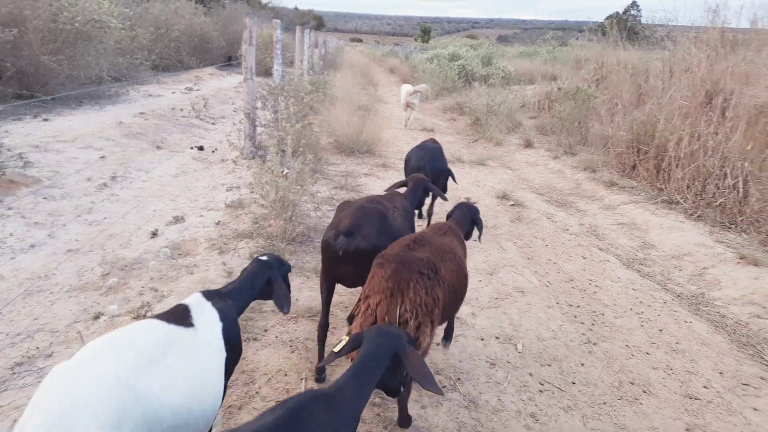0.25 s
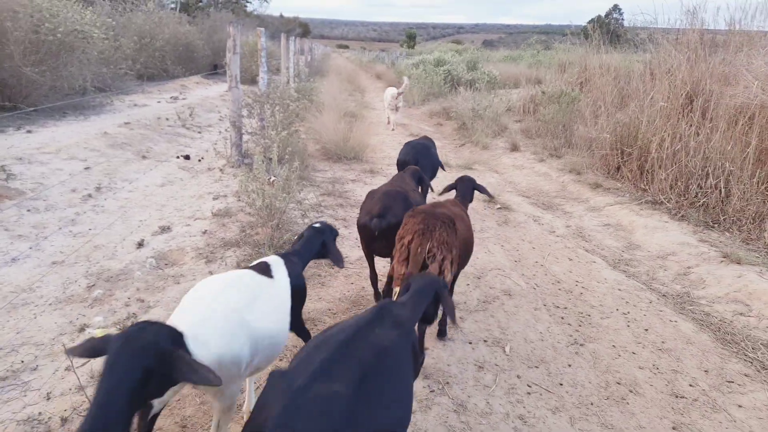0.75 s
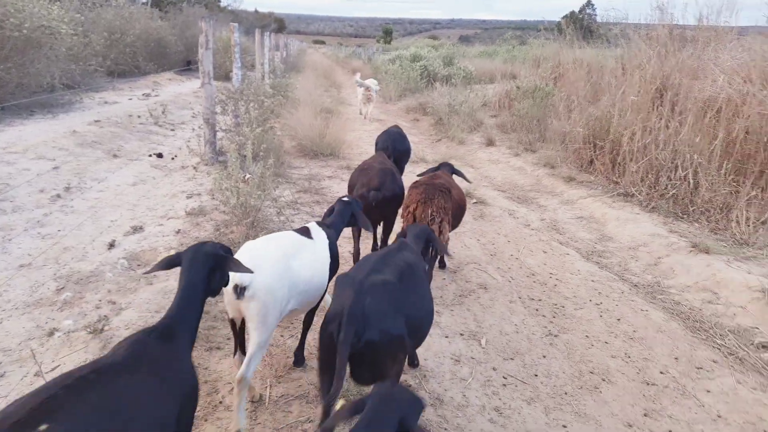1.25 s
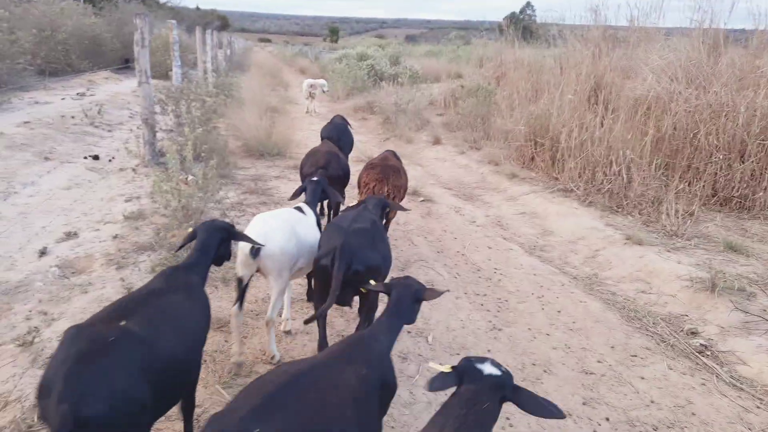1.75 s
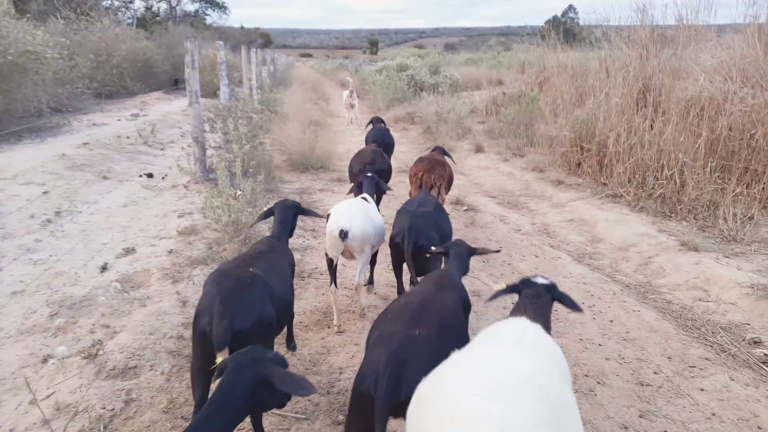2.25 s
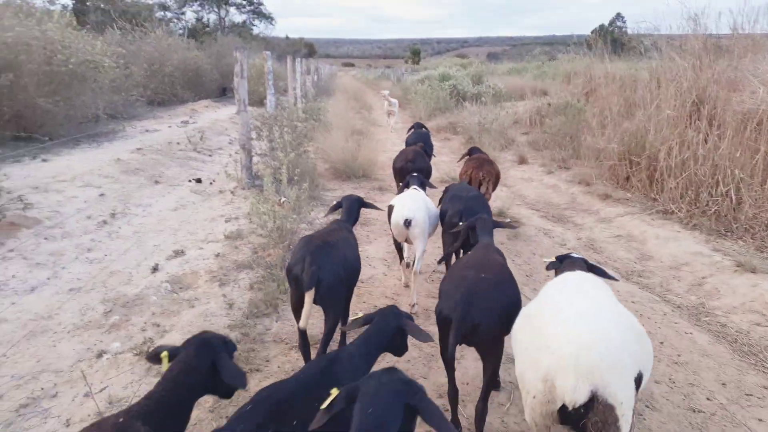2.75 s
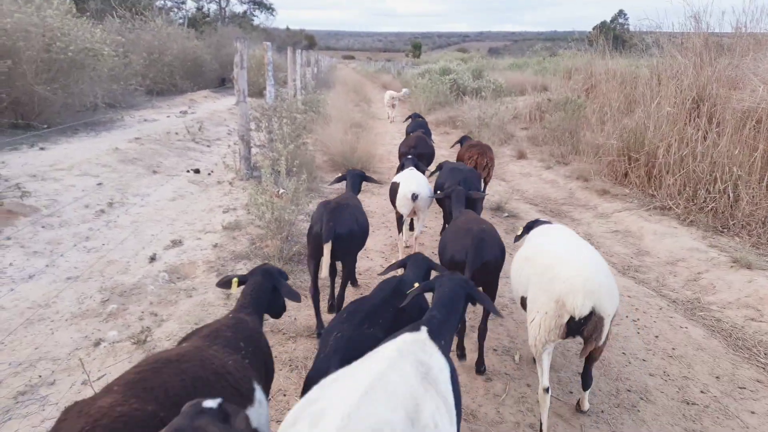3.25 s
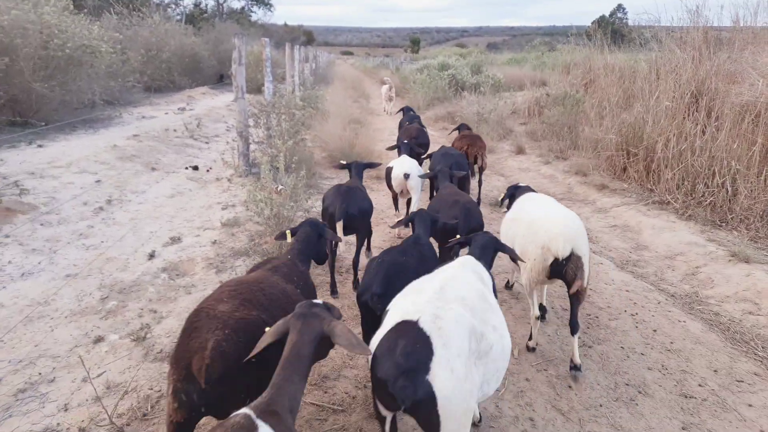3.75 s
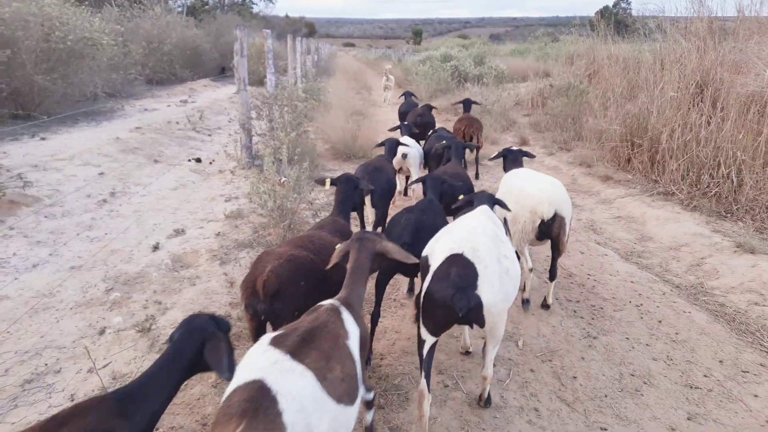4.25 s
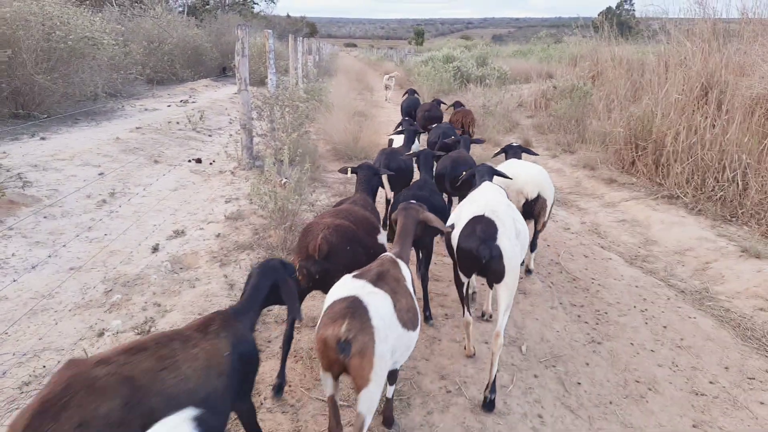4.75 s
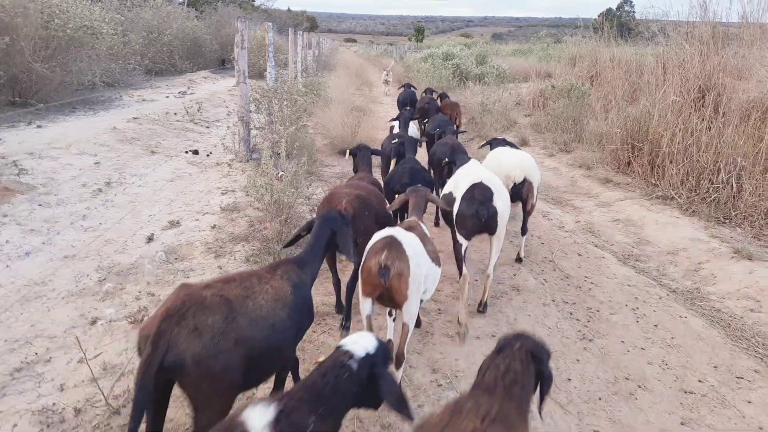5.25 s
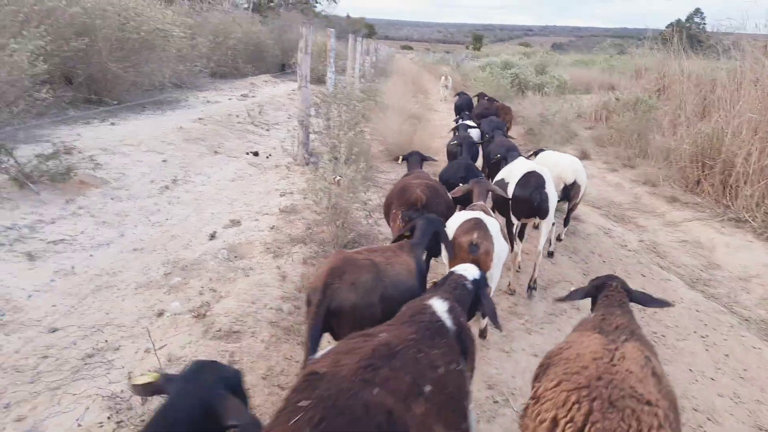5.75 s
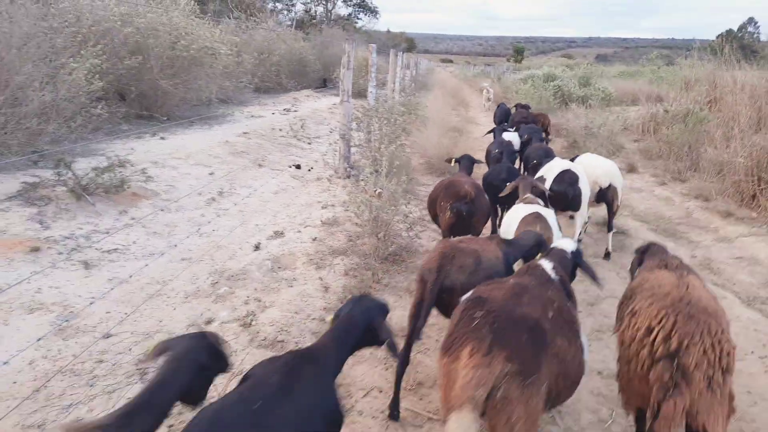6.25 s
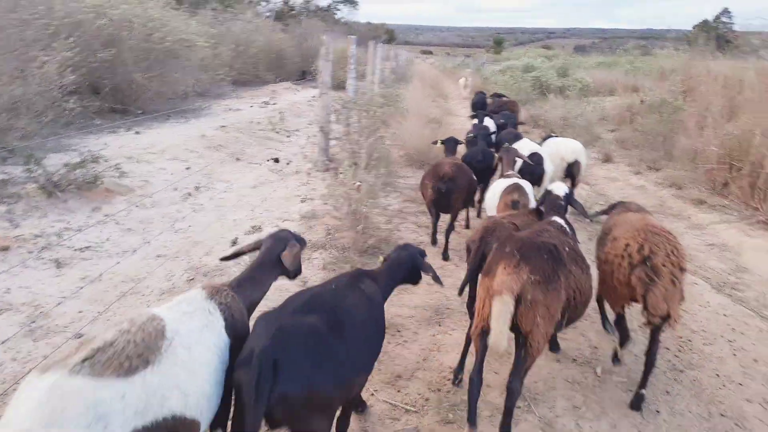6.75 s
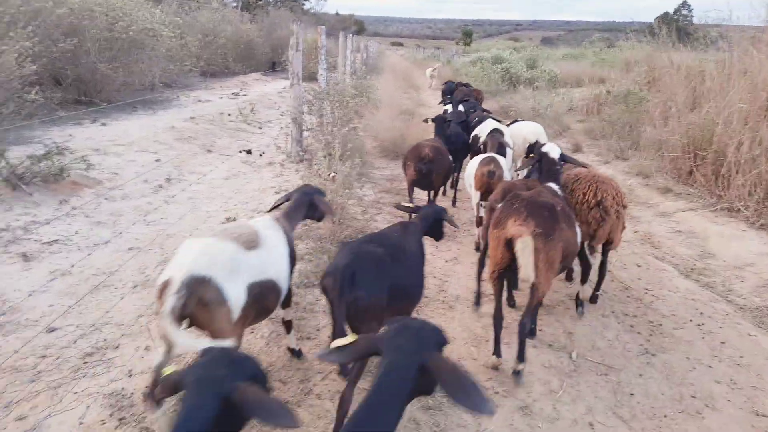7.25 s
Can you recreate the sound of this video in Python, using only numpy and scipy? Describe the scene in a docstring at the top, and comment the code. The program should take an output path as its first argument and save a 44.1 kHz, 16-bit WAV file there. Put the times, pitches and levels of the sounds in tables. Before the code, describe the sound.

Sheep hooves patter on a dry dirt track in open country. Quiet, scattered crunches and soft thuds come first, then sharper gritty steps stand out around the middle, and the last seconds are busiest and loudest. Dragged feet scrape, small pebbles click, dust hisses. Low wind gusts rumble now and then on a close handheld stereo phone microphone, over a faint steady hush.

```python
"""On a dry dirt track a flock of sheep trots past a phone with two microphone ports.
Each hoof thuds the soil, knocks and crunches grit: bursts of noise grains ring resonances.
Steadier grain noise makes dragged feet and far hooves; short decaying tones make skipping pebbles.
Gusts rumble on the ports, over a steady hush, with a few hollow notes and one thin high tick."""
import sys
import numpy as np
from scipy import signal
from scipy.io import wavfile
from scipy.ndimage import uniform_filter1d

SR = 44100
rng = np.random.default_rng(int(sys.argv[2]) if len(sys.argv) > 2 else 0)


def wav_record(signal):
    """Record a signal, one row per channel, as 16-bit PCM in the file named by sys.argv[1]."""
    frames = np.transpose(np.atleast_2d(signal))
    bounded = np.clip(frames, -1, 1)
    # unit amplitude maps onto the largest positive 16-bit level
    quanta = np.round(bounded * 32767).astype(np.int16)
    wavfile.write(sys.argv[1], SR, quanta)


N = 330309

# clear footfalls, levels before each layer's trim: time [s], crunch_level [dB], thud_level [dB],
# knock_level [dB], grit_level [dB], pebble_pitch [Hz], crunch_fade over 60 dB [s]
STEPS = [(0.063, -47, -40, -59, -51, 3180, 0.076), (0.0904, -48.5, -52, -63, -55, 4760, 0.14),
         (0.3647, -51, -45, -68, -54, 3320, 0.071), (0.4399, -37.5, -71, -64, -36, 3630, 0.027),
         (.52, -46, -63, -61, -44.5, 4260, 0.052), (0.6809, -34, -43.5, -41, -62, 2520, 0.047),
         (0.701, -38.5, -44, -49, -46, 3000, 0.062), (.868, -46, -62, -58, -55, 4200, .015),
         (.8975, -36.5, -48, -44.5, -57, 3800, 0.021), (1.2284, -53, -54.5, -46, -48, 2760, 0.095),
         (1.2495, -35, -47, -47.5, -39, 4000, 0.074), (1.3814, -48, -40.5, -54, -50, 3800, 0.056),
         (1.4892, -43, -67, -55, -49, 3200, .081), (1.512, -39, -53.5, -52.5, -54, 3820, 0.071),
         (1.528, -55, -43, -53, -59, 3050, 0.055), (1.6053, -28.5, -36.5, -31.5, -50, 3430, 0.053),
         (1.6196, -22, -35.5, -32.5, -28.5, 3800, 0.031), (1.7148, -59, -40.5, -45, -65, 2370, 0.067),
         (1.7608, -41, -44, -47, -49, 2870, 0.071), (1.8374, -55, -39, -48, -58, 2770, 0.076),
         (1.8483, -50, -41.5, -44.5, -52, 2620, 0.076), (1.8819, -34.5, -47, -62, -40, 4050, 0.021),
         (2.0747, -55, -45, -39.5, -50, 3100, 0.051), (2.091, -44, -45.5, -47.5, -42, 3500, 0.04),
         (2.2249, -52, -47.5, -40.5, -51, 3600, 0.044), (2.2638, -38.5, -57, -53, -43, 3970, .039),
         (2.3222, -43, -68, -55, -54, 4000, 0.062), (2.4275, -50, -42, -54, -50, 3500, 0.037),
         (2.4924, -57, -32, -32, -58, 3700, 0.015), (2.6384, -21.5, -42, -35.5, -38, 3600, 0.062),
         (2.801, -45, -42.5, -58, -46, 2830, 0.048), (2.8742, -63, -40, -41.5, -48, 3670, 0.031),
         (2.9175, -57, -40.5, -71, -64, 2150, 0.045), (2.9784, -49, -46, -64, -48, 2940, 0.028),
         (3.091, -52, -49, -62, -41.5, 2790, 0.028), (3.1649, -63, -53, -69, -60, 4080, 0.031),
         (3.1877, -52, -44, -68, -42.5, 4150, 0.021), (3.2154, -36, -56, -50, -58, 3070, .024),
         (3.235, -39.5, -48.5, -53, -57, 3070, 0.047), (3.3865, -38, -64, -52, -53, 3380, 0.019),
         (3.477, -37.5, -73, -59, -53, 3370, 0.016), (3.5186, -33.5, -42, -47.5, -37, 3100, 0.036),
         (3.535, -67, -35, -47, -44, 3260, 0.041), (3.5642, -28.5, -51, -60, -35, 5230, 0.02),
         (3.6194, -41, -46.5, -51, -49, 3570, 0.039), (3.655, -38, -52, -47.5, -36.5, 3070, .038),
         (3.7195, -43, -51, -57, -62, 2290, .052), (3.813, -38.5, -40.5, -48, -41, 2320, .044),
         (4.0357, -41, -50, -46, -39, 3320, 0.022), (4.044, -18, -49, -32, -31, 3380, 0.037),
         (4.0512, -18, -61, -45, -41, 3440, .034), (4.077, -28, -47, -44, -43, 3450, 0.093),
         (4.0886, -14, -41.5, -32, -26, 3600, 0.06), (4.203, -44.5, -49.5, -53, -41, 3580, 0.04),
         (4.2497, -33.5, -55, -40.5, -53, 2290, 0.011), (4.4544, -29.5, -63, -54.5, -37.5, 4280, 0.042),
         (4.487, -62, -48.5, -72, -61, 3310, 0.028), (4.6337, -47.5, -52, -66, -61, 2930, 0.067),
         (5.0123, -40, -44, -43, -51, 3800, .057), (5.0198, -28.5, -45, -55, -35, 3780, 0.11),
         (5.0897, -45, -46.5, -64, -56, 3550, 0.036), (5.176, -30, -51, -46, -40, 3300, 0.027),
         (5.1859, -17.5, -52, -39.5, -31, 3730, 0.037), (5.229, -33, -54, -47.5, -42.5, 3420, 0.078),
         (5.3079, -66, -45, -51.5, -47, 3300, 0.053), (5.374, -25, -53, -47.5, -34, 2940, .016),
         (5.45, -37, -69, -71, -44, 3530, 0.024), (5.471, -33.5, -57, -49, -50, 3350, 0.024),
         (5.503, -59, -56, -46, -65.5, 3460, 0.033), (5.539, -32, -57, -47, -61, 3080, 0.14),
         (5.6347, -12, -53, -42, -17.5, 3630, 0.038), (5.8983, -41.5, -59, -56, -41, 5030, 0.035),
         (6.053, -20, -38.5, -34, -56, 2970, .088), (6.1234, -47, -43, -49, -50, 2960, 0.042),
         (6.1786, -47, -50, -47, -43, 3330, 0.035), (6.2592, -18.5, -39.5, -35.5, -37, 2900, 0.068),
         (6.3253, -50, -50, -48, -41, 3520, 0.082), (6.4089, -30, -35.5, -38, -42, 3360, 0.0406),
         (6.4242, -19, -52, -41, -26.5, 3450, .04), (6.4336, -21, -30, -31.5, -36, 3760, 0.032),
         (6.4612, -22, -44, -41, -35, 3480, .046), (6.4863, -34.5, -58, -49, -42, 3230, 0.059),
         (6.584, -38, -76, -67, -60, 3560, 0.04), (6.6484, -43.5, -44, -43.5, -59, 3270, 0.063),
         (6.7226, -42.5, -50.5, -51, -54, 2980, 0.061), (6.8371, -27, -48, -48, -38, 3220, 0.11),
         (6.885, -41, -62, -65, -42.5, 3220, 0.048), (6.93, -29, -54, -45.5, -43, 3320, .04),
         (7.0184, -33.5, -61, -48.5, -57, 2760, 0.028), (7.1672, -43.5, -73, -64, -44, 3580, 0.045),
         (7.2538, -50.5, -44.5, -49, -44, 3180, 0.046), (7.3456, -56, -53.5, -51.5, -52, 3120, 0.064),
         (7.4585, -46, -59, -54, -46, 3200, 0.032)]
# what hoof, soil and grit ring with: pitch [Hz], width [Hz], relative_level [dB]
THUD = [(315, 77.5, 2.5), (570, 296, -5)]
KNOCK = [(746, 450, 0.0058), (1500, 1470, 0.045)]
CRUNCH = [(2486, 2120, -2), (4100, 2000, -1), (5150, 740, 1)]
GRIT = [(6270, 800, 1), (7720, 3400, -7.5), (8750, 480, -3.5), (10760, 2300, -20), (12000, 1100, -4),
        (14800, 2400, -8.5)]
LAG_LOW, LAG_HIGH = 9, 13  # samples by which the right port hears the lower and higher layers later


def undb(db):
    """Gain of a level in dB."""
    return 10 ** (np.asarray(db) / 20)


def unit(x):
    """Scale to an average strength (rms) of 1."""
    return x / np.sqrt(np.mean(x ** 2))


def ring(x, modes):
    """Sum of resonances; white noise of rms 1 comes out near rms 1."""
    out, power = 0, 0
    for k, (hz, width, db) in enumerate(modes):
        gain = undb(db)
        b, a = signal.iirpeak(hz, hz / width, fs=SR)
        out = out + (-1) ** k * gain * signal.lfilter(b, a, x)  # neighbours have opposite signs
        power += gain ** 2 * np.pi * width / SR
    return out / np.sqrt(power)


def narrow(x, hz, q):
    """One resonance applied twice, for steep sides."""
    mode = [(hz, hz / q, 0)]
    return ring(ring(x, mode), mode) * np.sqrt(np.pi * hz / q / SR * 2)


def grains(scatter_db, grain_s, size=N):
    """Noise made of short grains of uneven size; the biggest are capped."""
    k = max(int(grain_s * SR), 1)
    sizes = np.minimum(rng.exponential(size=size // k + 1), 3.5)
    force = np.repeat(undb(scatter_db * sizes), k)[:size]
    return unit(force) * rng.standard_normal(size)


def walk(rate):
    """Random levels, each held for 1 / rate seconds, then smoothed twice."""
    k = int(SR / rate)
    held = np.repeat(rng.standard_normal(N // k + 1), k)
    return uniform_filter1d(uniform_filter1d(held, k), k)[:N]


def ports(force, modes, lag, scatter_db, grain_s, apart, pan_db=0.):
    """Grains under the force ring the modes at both ports; the share 'apart' of power is each port's own."""
    apart, size = np.clip(apart, 0, 1), np.shape(force)[-1]
    both = grains(scatter_db, grain_s, size)
    noise = [np.sqrt(1 - apart) * both + np.sqrt(apart) * grains(scatter_db, grain_s, size)
             for _ in range(2)]
    push = force * np.array(noise)
    push *= np.sqrt(np.mean(force ** 2) / np.mean(push ** 2))  # the grains share out the force's energy
    left, right = ring(push, modes)
    return np.array([left * undb(pan_db / 2), np.roll(right, lag) * undb(-pan_db / 2)])


def curve(table):
    """Draw the columns of a table out over time, in straight lines between its rows."""
    s, *columns = np.transpose(table)
    return [np.interp(np.arange(N) / SR, s, c) for c in columns]


def air():
    """The steady hush of open country: even noise through broad resonances."""
    # broad colour of the hush: pitch [Hz], width [Hz], relative_level [dB]
    hush_modes = [(328, 530, -4.5), (1200, 2200, -7), (3420, 5000, -5), (7240, 4100, -5),
                  (12940, 3100, -4.5)]
    return ports(np.full(N, undb(-57.5)), hush_modes, LAG_HIGH, .3, 0.0032, 1.0)


def wind(db):
    """Eddies buffet each port mostly on its own, the left one harder in strong gusts."""
    # low rumble at the ports: pitch [Hz], width [Hz], relative_level [dB]
    rumble_modes = [(54, 31.5, 0.5), (100, 55.9, 0.5), (159.2, 66.3, -5)]
    lean_db = 0.14 * (db + 61)
    buffet_db = np.array([lean_db + 3 * walk(12), -lean_db + 3 * walk(21)])
    return ports(undb(db + 9.5 + buffet_db), rumble_modes, 0, 4.3, .015, 0.89)


def tick():
    """A few milliseconds of one very high pitch, swelling and fading in a bell shape."""
    # the tick, level before a small trim: start [s], peak_level [dB], pitch [Hz], spread [s],
    # left_minus_right [dB]
    tick_rows = [(6.755, -21, 13150, 0.0011, 7)]
    s, db, hz, spread, pan = tick_rows[0]
    t = np.arange(N) / SR
    bell = np.exp(-.5 * ((t - s - 2 * spread) / spread) ** 2)  # peaks two spreads after the start
    tone = bell * np.sin(2 * np.pi * hz * t)
    return np.outer(undb(db - 0.5 + np.array([pan, -pan]) / 2), tone)


def notes():
    """Short hollow notes: rough tones that glide, with wavering pitch and level, and fade."""
    # middle of the waver: start [s], from_pitch [Hz], to_pitch [Hz], length [s], level [dB]
    note_rows = [(0.799, 870, 883, 0.11, -51.5), (1.217, 860, 895, 0.06, -44),
                 (3.82, 1160, 1140, 0.052, -52), (4.728, 1190, 1260, 0.068, -52),
                 (5.011, 690, 680, 0.0098, -32.5)]
    out = np.zeros(N)
    waver = 1 + 0.09 * walk(300)
    for s, from_hz, to_hz, length, db in note_rows:
        u = np.linspace(0, 1, int(length * SR))
        i = int(s * SR)
        hz = (from_hz + (to_hz - from_hz) * u) * waver[i:i + len(u)]
        swell = np.sin(np.pi * u ** 0.62) ** 2
        out[i:i + len(u)] = undb(db) * swell * np.sin(2 * np.pi * np.cumsum(hz) / SR)
    out *= undb(7.9 * walk(170))
    return np.array([out, np.roll(out, LAG_LOW)])


def pebbles(scuff_db, count=2500):
    """Loose stones skip: short rings at random times, louder where feet scuff."""
    s, pitch, size, cycles = rng.random((count, 4)).T
    starts = (s * N).astype(int)
    pitches_hz = 1300 * 6. ** pitch
    sizes_db = 18 * size ** 2  # most stones are small
    turns_each = 1.7 + 7 * cycles  # swings until a ring has mostly died
    out, k = np.zeros(N + 512), np.arange(512)
    for i, hz, db, turns in zip(starts, pitches_hz, sizes_db, turns_each):
        fade = np.exp(-3 * k * hz / (turns * SR))
        out[i:i + 512] += undb(db) * fade * np.sin(2 * np.pi * hz * k / SR)
    out = unit(out[:N]) * undb(scuff_db - 10)
    return np.array([out * undb(-6), np.roll(out, LAG_HIGH)])


def stirred(scuff_db):
    """A hoof drags grit as it lands and leaves, so scuffing swells around each clear blow."""
    level_db, before_s, after_s = -22.5, 0.017, 0.05  # against the crunch level; swell and fade times
    t = np.arange(-SR // 4, SR // 4) / SR
    hump = np.exp(-2 * np.where(t < 0, -t / before_s, t / after_s))
    blows = np.zeros(N)
    blows[[int(row[0] * SR) for row in STEPS]] = [undb(row[1] + level_db) ** 2 for row in STEPS]
    stir_power = np.maximum(signal.fftconvolve(blows, hump, mode="same"), 0)
    return 10 * np.log10(undb(scuff_db) ** 2 + stir_power)


def shuffle(patter_db, scuff_db, hiss_db):
    """Far hooves patter low, dragged feet scrape the grit, fine dust hisses."""
    flicker, lumps = 3.5 * walk(35), 4.5 * walk(40)  # uneven levels in dB
    knock_db = (patter_db + scuff_db) / 2 - 3.5 + flicker
    dust_modes = GRIT[1:]  # loose dust lacks the lowest ring of struck grit
    patter = ports(undb(patter_db - 0.3 + lumps), THUD, LAG_LOW, 3.8, 0.0071, 0.12)
    knock = ports(undb(knock_db), KNOCK, LAG_LOW, 3.0, 0.0019, 0.42)
    scrape = ports(undb(scuff_db - 0.4 + flicker), CRUNCH, LAG_HIGH, 2.9, 0.0039, 0.56, pan_db=-1.0)
    dust = ports(undb(hiss_db + 1.0 + 0.37 * flicker), dust_modes, LAG_HIGH, 3.3, 0.0031, 0.97, pan_db=1.5)
    return patter + knock + scrape + dust


def blow(db, t60, rise, tail_db, crack=0.):
    """Force of one step: it builds up to a crack, dies quickly, then settles three times as long."""
    t, t60, rise = np.arange(SR // 5) / SR, np.clip(t60, .006, .3), np.clip(rise, 1e-4, .04)
    after = np.maximum(t - rise, 0)
    build = np.minimum(t / rise, 1) ** 2
    body = undb(-60 * after / t60)
    tail = undb(tail_db - 20 * after / t60)
    return undb(db) * build * (body + tail + crack * np.exp(-after / 0.0013))


def steps():
    """Each footfall rings the shared modes, and the clod and pebble under it add their own pitch."""
    # feet that slide in and swell, levels before each layer's trim: time [s], crunch_level [dB],
    # thud_level [dB], knock_level [dB], grit_level [dB], pebble_pitch [Hz],
    # crunch_fade over 60 dB, at most 0.3 used [s]
    slide_rows = [(.722, -29.5, -43.5, -42, -36, 4200, 0.068), (1.1947, -42, -52, -67, -49, 3800, 0.16),
                  (1.265, -41, -57, -50, -45, 3900, 0.052), (1.361, -45, -55.5, -53, -58, 3750, 0.13),
                  (1.795, -40, -54, -52.5, -54, 3230, 0.13), (2.045, -46.5, -59, -52, -60, 3540, 0.076),
                  (2.1246, -47, -63, -54, -57, 4020, 0.14), (2.5582, -45, -60, -56, -45.5, 2640, 0.14),
                  (4.345, -30, -56, -48.5, -52, 3540, 0.13), (4.3712, -29, -61, -46.5, -50, 3100, 0.1),
                  (4.9607, -37, -71, -55.5, -52, 3580, 0.26), (5.5987, -32.5, -54, -45.5, -44, 3420, 0.12),
                  (5.683, -36.5, -61, -48, -54, 3320, 0.17), (5.7411, -38, -49, -53, -59, 3500, 0.095),
                  (5.95, -34.5, -56, -44, -48, 3430, 0.65), (6.23, -35.5, -44, -34.5, -50, 2260, 0.036),
                  (6.407, -26, -38, -40.5, -38, 3400, .13), (6.7554, -30, -50, -42, -39.5, 3440, 0.22),
                  (6.8305, -28.5, -55, -49, -40, 3390, 0.1)]
    sand_hz = 6904  # upper ring of every crunch
    out = np.zeros((2, N + SR))
    falls = [(*row, 0.0355 * row[-1]) for row in STEPS]  # build-up is a share of the fade
    falls += [(*row, .012) for row in slide_rows]  # a sliding foot swells for a set time, in s
    for s, crunch_db, thud_db, knock_db, grit_db, pebble_hz, t60, rise in falls:
        crack = 0.52 * np.exp(-rise / 0.0028)  # a sliding foot has almost none
        # the clod's pitch rises as crunch outweighs thud
        clod_hz = 704 * 2 ** np.clip(0.14 * (crunch_db - thud_db), -.4, 1.3)

        thud_force = blow(thud_db + 0.5, 0.88 * t60, 2.52 * rise, -10.5)
        knock_force = blow(knock_db - 1, 1.286 * t60, rise, -14.5, crack)
        crunch_force = blow(crunch_db - 9.5, t60, rise, -11, crack)
        grit_force = blow(grit_db - 0.5, 0.58 * t60, rise, -17, crack)

        thud = ports(thud_force, THUD, LAG_LOW, 4.65, 0.0018, 0.15, pan_db=-0.4)
        knock = ports(knock_force, KNOCK, LAG_LOW, 3.25, 0.0012, 0.32, pan_db=-0.5)
        crunch = ports(crunch_force, CRUNCH, LAG_HIGH, 3.45, 0.0009, 0.21, pan_db=-3.0)
        grit = ports(grit_force, GRIT, LAG_HIGH, 1.0, .0005, 1.0, pan_db=0.5)

        clod = 0.35 * narrow(knock, clod_hz, 1.48)
        pebble = 0.55 * narrow(crunch, pebble_hz, 2.08)
        sand = 0.44 * narrow(crunch, sand_hz, 5.0)
        step = thud + 1.28 * knock + clod + 1.37 * crunch + pebble + sand + grit
        i = int((s - .8 * rise) * SR)  # the build-up starts ahead of the listed time
        out[:, i:i + step.shape[1]] += step
    return out[:, :N]


def scene():
    """Steps over the shuffle of the flock, the wind and the hush."""
    # gusts, before a trim and buffeting: time [s], wind_level [dB]
    gust_rows = [(0, -73), (.46, -79), (.52, -62), (.67, -61), (.82, -73), (1.15, -71), (1.7, -73),
                 (1.77, -54), (1.93, -65), (2.09, -52), (2.33, -58), (2.56, -51.5), (2.66, -57),
                 (2.88, -39), (3.0, -46.5), (3.3, -47), (3.42, -57), (3.54, -48.5), (3.71, -65),
                 (4.01, -72.5), (4.11, -67.5), (4.5, -78.5), (4.86, -75), (5.05, -50.5), (5.13, -61),
                 (5.19, -50.5), (5.3, -66), (5.46, -78), (5.76, -76), (5.92, -55), (6.15, -62),
                 (6.35, -57.5), (6.7, -63.5), (6.82, -56.5), (7.05, -60), (7.18, -77), (7.39, -56),
                 (7.49, -85)]
    # flock between the clear steps, before trims and flicker: time [s], far_patter_level [dB],
    # scuff_level [dB], dust_hiss_level [dB]
    flock_rows = [(0, -65, -57.5, -65), (.15, -63, -51, -58), (.31, -59, -59, -68),
                  (.45, -64.5, -54.5, -52.5), (.62, -58.5, -57.5, -62), (1.04, -58.5, -57, -62),
                  (1.25, -61, -51, -61), (1.6, -59.5, -59, -62), (1.95, -63.5, -50, -55),
                  (2.15, -59.5, -50.5, -55), (2.4, -61.5, -59, -66), (2.6, -63, -47, -55),
                  (2.85, -52.5, -56, -63), (3.3, -63, -55, -59), (3.8, -56.5, -50.5, -54),
                  (4.0, -63, -57.5, -59), (4.17, -52.5, -50, -55.5), (4.45, -60, -59, -62),
                  (4.86, -60.5, -54.5, -62.5), (5.05, -59, -49, -59), (5.46, -63, -59, -61),
                  (5.75, -58, -49.5, -53), (5.9, -70.5, -53.5, -62), (6.15, -49.5, -51.5, -65),
                  (6.6, -60, -50.5, -56), (6.85, -58, -50.5, -57), (7.18, -70, -53, -60.5),
                  (7.49, -59.5, -55, -58)]
    patter_db, scuff_db, hiss_db = curve(flock_rows)
    scuff_db = stirred(scuff_db)
    background = air() + wind(*curve(gust_rows)) + tick() + notes()
    return background + pebbles(scuff_db) + shuffle(patter_db, scuff_db, hiss_db) + steps()


def record(dry):
    """The phone drops the deepest rumble (below 35 Hz) and cuts the top (above 15700 Hz)."""
    dry = signal.sosfilt(signal.butter(2, 35, "high", fs=SR, output="sos"), dry)
    return signal.sosfilt(signal.ellip(10, .2, 70, 15700, fs=SR, output="sos"), dry)


dry = scene()
out = record(dry)
wav_record(out)
```